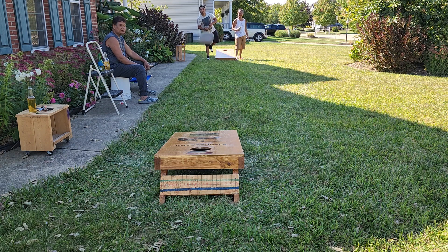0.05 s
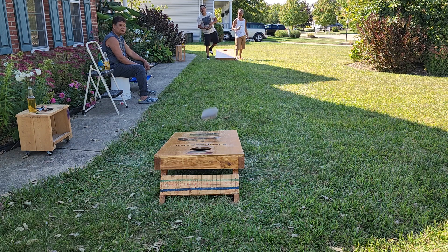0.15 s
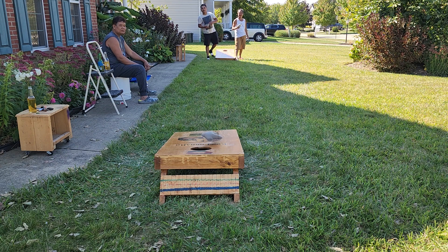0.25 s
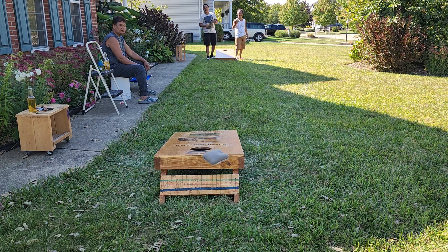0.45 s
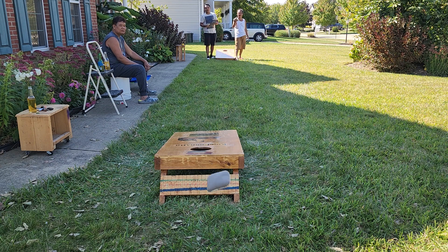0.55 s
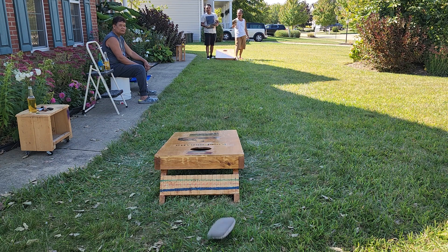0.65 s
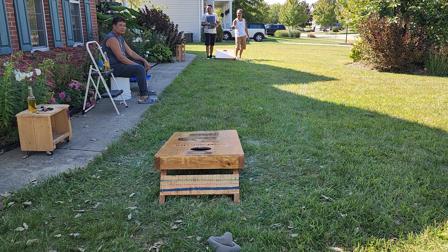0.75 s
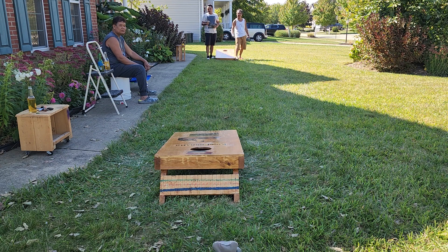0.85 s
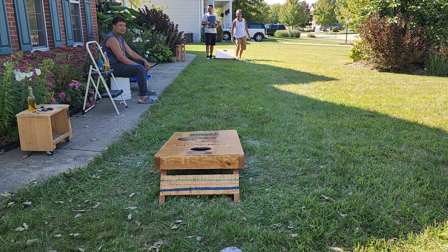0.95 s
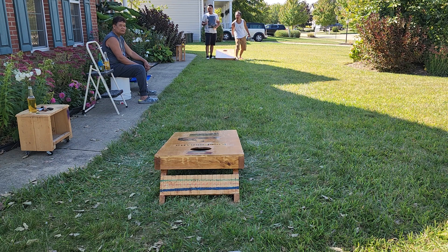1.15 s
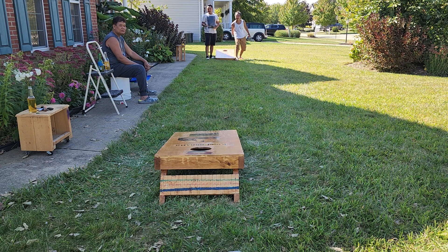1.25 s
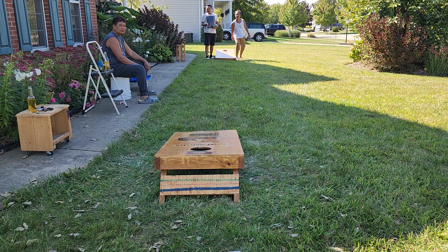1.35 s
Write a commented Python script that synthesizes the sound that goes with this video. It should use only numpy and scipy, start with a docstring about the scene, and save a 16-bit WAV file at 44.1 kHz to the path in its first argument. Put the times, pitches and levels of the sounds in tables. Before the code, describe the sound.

Loud woody beanbag thunk on a hollow board, faint grassy drop after, insects chirring quietly behind.

```python
"""Three insects chirp over a far chorus, a faint bird peeps, and distant traffic rumbles as shaped noise.
Then a beanbag slaps onto a hollow wooden board: filtered clicks ring the wood, and noise adds slap and tail.
The filling rattles as tiny random clicks, and so does the cloth that slides towards the edge.
At last the bag drops: the soil gives a dull ringing bump and the grass a soft swell of tiny clicks."""
import sys
import numpy as np
from scipy import signal
from scipy.fft import rfft, irfft, next_fast_len
from scipy.io import wavfile

SR = 44100
rng = np.random.default_rng(int(sys.argv[2]) if len(sys.argv) > 2 else 0)


def materialize(psi):
    """Save the field psi as 16-bit PCM at rate SR to the path in sys.argv[1].

    A 1-D psi becomes a single channel; in a 2-D psi each row is a channel.
    """
    bounded = np.clip(np.atleast_2d(psi).T, -1, 1)
    quanta = np.round(bounded * 32767).astype(np.int16)
    wavfile.write(sys.argv[1], SR, quanta)


N = 61739
T = np.arange(N) / SR  # time of every sample, in seconds
LAND_S = 0.2241  # the bag hits the board


def from_db(db):
    """Turn decibels into a gain."""
    return 10 ** (np.asarray(db) / 20)


def rms_one(x):
    """Scale a sound to an average strength (rms) of 1."""
    return x / np.sqrt(np.mean(x ** 2) + 1e-20)


def level(rows):
    """Draw a gain over time through points of time and dB."""
    return from_db(np.interp(T, *np.transpose(rows)))


def at_hz(points, hz):
    """Read a table between its points, on a log-frequency axis."""
    f, v = np.transpose(points)
    return np.interp(np.log(hz + 1), np.log(f), v)


def drift(rate):
    """Wander by chance with spread 1, no faster than about `rate` Hz."""
    noise = rng.standard_normal(N + SR)
    lowpass = signal.butter(2, rate, fs=SR, output="sos")
    return rms_one(signal.sosfilt(lowpass, noise)[SR:])  # skip the filter's first second


def colour(pair, spectrum):
    """Blend two unrelated sources into one stereo texture with the given spectrum and rms 1."""
    # how alike left and right are: (f/Hz, likeness from -1 to 1)
    ear_likeness = [(60, 0.95), (250, 0.97), (600, 0.56), (1200, -0.014), (2500, 0.37), (5000, 0.39),
                    (9000, -.15), (15000, -.2)]
    size = next_fast_len(N)
    hz = np.arange(size // 2 + 1) * SR / size
    mid, side = rfft(pair, size) * from_db(at_hz(spectrum, hz))
    alike = np.clip(at_hz(ear_likeness, hz), -.999, .999)
    shared = np.sqrt(1 + alike) * mid
    opposed = np.sqrt(1 - alike) * side * [[1], [-1]]
    return rms_one(irfft(shared + opposed, size)[:, :N])


def hiss(spectrum):
    """Make smooth stereo noise."""
    return colour(rng.standard_normal((2, N)), spectrum)


def grains(spectrum):
    """Scatter dense tiny clicks of uneven size, as many small contacts do."""
    grains_per_s, spread_db = 2400, 3.5
    loudness = spread_db * np.minimum(rng.exponential(1, (2, N)), 4)
    sizes = from_db(loudness) * rng.choice([-1, 1], (2, N))
    present = rng.random((2, N)) < grains_per_s / SR
    return colour(sizes * present, spectrum)


def burst(s, t60, rise):
    """Climb 60 dB in `rise` seconds to the top at s, then fall 60 dB in `t60` seconds."""
    return from_db(-60 * np.maximum((T - s) / t60, (s - T) / rise))


def ring(force, hz, t60):
    """Let a force set off a dying sine, about 1 high for a unit click."""
    r = from_db(-60 / (t60 * SR))  # what is left after each sample
    w = 2 * np.pi * hz / SR
    return signal.lfilter([0, np.sin(w)], [1, -2 * r * np.cos(w), r * r], force + 1e-18)


def push(s, db, low_hz, high_hz):
    """Make a contact: a click with less bass if it is light and less treble if it is soft."""
    click = np.full(N, 1e-18)
    click[int(s * SR)] = from_db(db)
    band = signal.butter(2, [low_hz, high_hz], "band", fs=SR, output="sos")
    return signal.sosfilt(band, click)


def board():
    """Each blow rings the board's modes; the landing adds a crack, a slap and a dense woody tail."""
    # the bag's face lands, its weight follows, then it slumps and flops over:
    # (t/s, level of the click before its filter/dB, lowest f/Hz, highest f/Hz)
    blows = [(0.2241, -1, 270, 4200), (0.2322, -4, 40, 380), (0.2657, -12, 20, 105), (0.3025, -18, 20, 380),
             (0.3295, -10, 20, 95)]
    # ways the hollow board vibrates: (f/Hz, relative level/dB, time to fall 60 dB/s)
    board_modes = [(85.9, -14.5, 0.54), (113.7, -19.5, 0.61), (163.4, -17, 0.58), (194.6, -23.5, .42),
                   (247.4, -23, 0.25), (263.6, -26, 0.69), (357.8, -3, .075), (399.2, -15, .1),
                   (520.3, -6.5, 0.073), (554.4, -20.5, .16), (657, -10.5, 0.11), (787.8, -13.5, 0.11),
                   (1048, -7, 0.023), (1290.6, -14, 0.058), (1486, -20, .06), (1736, -20.5, 0.041),
                   (2144, -17, .05), (2374, -16, 0.041), (2750, -20, .035), (3400, -31, .035)]
    # crack of the first hard contact: (f/Hz, relative level/dB, time to fall 60 dB/s)
    crack_modes = [(1950, -2.5, .003), (3700, -5, .003)]
    # tone of the slap: (f/Hz, relative level per Hz/dB)
    slap_spectrum = [(150, -13), (400, 1), (900, 0.5), (1500, 2), (2600, -0.5), (3700, -11), (5000, -29),
                     (8000, -28), (15000, -32.5)]
    # tone of the dying tail in the many small modes of the wood: (f/Hz, relative level per Hz/dB)
    tail_spectrum = [(100, -5), (300, -2), (650, -4), (1100, -18), (2500, -26), (5000, -32), (15000, -43)]
    scatter_db = 1.15  # every blow strikes each mode a little differently
    pan_db, lag_s = 0.08, .00003  # the left side is a touch louder, the right a touch later
    low_cut_hz = 55

    pushes = np.array([push(*blow) for blow in blows])
    scatter = rng.standard_normal((len(blows), len(board_modes)))
    strengths = from_db(scatter_db * scatter)
    knock = np.zeros(N)
    for k, (hz, db, t60) in enumerate(board_modes):
        sign = (-1) ** (k // 2)  # modes swing in pairs of opposite direction
        knock = knock + sign * from_db(db) * ring(strengths[:, k] @ pushes, hz, t60)
    for hz, db, t60 in crack_modes:
        knock = knock - from_db(db) * ring(pushes[0], hz, t60)
    knock = np.array([from_db(pan_db) * knock, np.interp(T - lag_s, T, knock)])

    slap = from_db(-12) * burst(LAND_S, t60=0.041, rise=0.00038) * hiss(slap_spectrum)
    tail = from_db(-20.5) * burst(LAND_S, t60=.17, rise=.001) * grains(tail_spectrum)
    highpass = signal.butter(2, low_cut_hz, "high", fs=SR, output="sos")
    return signal.sosfilt(highpass, knock + slap + tail)


def bag():
    """The filling rattles at every flop while the cloth slides over the wood towards the edge."""
    # shakes of the filling: (t/s, level/dB, time to fall 60 dB/s)
    rattles = [(0.223, -35, 0.18), (0.252, -58, 0.025), (0.273, -53, 0.025), (0.305, -52.5, 0.067),
               (0.335, -56.5, 0.081), (0.401, -56.5, 0.027)]
    # tone of the filling: (f/Hz, relative level/dB)
    filling_spectrum = [(800, -4), (2500, 2.5), (5000, -2.5), (8000, -6.5), (12000, -14.5), (16000, -12.5)]
    # loudness of the sliding cloth: (t/s, level/dB)
    slide_level = [(0.25, -32), (0.31, -51), (0.385, -54), (0.425, -59), (0.46, -52.5), (0.5, -62.5),
                   (0.56, -66), (0.68, -68), (0.9, -78)]
    # tone of the cloth: (f/Hz, relative level/dB)
    cloth_spectrum = [(300, 0.5), (900, 5), (2400, 0.5), (3600, -12.5), (6000, -20), (13000, -21),
                      (16000, -27)]
    shaken = sum(from_db(db) * burst(s, t60, rise=0.019) for s, db, t60 in rattles)
    sliding = (T > LAND_S) * level(slide_level)
    return shaken * grains(filling_spectrum) + sliding * grains(cloth_spectrum)


def thud():
    """The ground takes the bag's weight: a soft push rings the soil in a dull bump."""
    return ring(push(s=0.65, db=-37, low_hz=42, high_hz=202), hz=115, t60=0.071)


def grass():
    """Blades crush under the falling bag in one soft swell, then settle more slowly."""
    # tone of the grass: (f/Hz, relative level/dB)
    grass_spectrum = [(120, 9.5), (400, 0), (1000, 4.5), (2200, 0), (4000, -3.5), (8000, -6.5),
                      (12000, -5.5), (16000, -1)]
    top_s, rise_s = 0.7366, .11
    crush = from_db(-49) * burst(top_s, t60=0.13, rise=rise_s)
    settle = from_db(-62.5) * burst(top_s, t60=0.42, rise=rise_s)
    return (crush + settle) * grains(grass_spectrum)


def chirps(first, last, period, first_hz, last_hz, arch_hz, ear_phase):
    """Each wing stroke is a short, slightly rough tone whose pitch arches up and falls."""
    width_s, skew_s, jitter_s = .012, .002, .0008  # half width, loudness after pitch top, uneven timing
    waver_hz, rough_db = 30, 2.2
    centres = np.arange(first, last, period)
    centres = centres + jitter_s * rng.standard_normal(len(centres))
    nearest = np.abs(T[:, None] - centres).argmin(axis=1)
    since = T - centres[nearest]  # negative before the pitch top
    top_hz = np.interp(T, [first, last], [first_hz, last_hz])
    arch = arch_hz * np.minimum((since / width_s) ** 2, 2)
    hz = top_hz - arch + waver_hz * drift(300)
    stroke = np.exp(-((since - skew_s) / width_s) ** 4) * from_db(rough_db * drift(250))
    phase = 2 * np.pi * np.cumsum(hz) / SR
    return stroke * np.sqrt(2) * np.sin(phase + ear_phase * np.array([[.5], [-.5]]))


def singer(runs, arch_hz, db, pan_db, ear_phase):
    """Place one insect by a difference in level (dB) and in phase (radians) between left and right."""
    sides = from_db(db + pan_db * np.array([[.5], [-.5]]))
    return sides * sum(chirps(*run, arch_hz, ear_phase) for run in runs)


def insects():
    """Three insects beat out tones at their own pace over a far chorus of smooth noise."""
    # runs of chirps of the near insect, whose pitch arches strongly:
    # (first t/s, last t/s, period/s, first f at the top of the arch/Hz, last f at the top of the arch/Hz)
    near_runs = [(.037, .28, .057, 8150, 8080), (.494, 1.42, .0559, 7940, 8120)]
    # a farther, higher insect, nearly level in pitch: same columns
    high_runs = [(.036, .49, .063, 8330, 8310), (.54, 1.42, .0605, 8310, 8310)]
    # a farther, lower insect, nearly level in pitch: same columns
    low_runs = [(.513, 1.42, .0622, 7560, 7760)]
    # tone of the far chorus: (f/Hz, relative level/dB)
    chorus_spectrum = [(4000, -37), (5500, -19), (6500, -2.5), (7600, -2), (8400, 0.5), (9100, -7.5),
                       (10000, -31.5), (16000, -34)]
    # gain on all insects and the chorus: (t/s, level/dB)
    insect_level = [(0, 4), (.21, 4.5), (.3, -1.5), (.7, -1), (1.4, 0)]
    near = singer(near_runs, arch_hz=520, db=-58, pan_db=0.6, ear_phase=2.6)
    high = singer(high_runs, arch_hz=110, db=-61.0, pan_db=5.5, ear_phase=.8)
    low = singer(low_runs, arch_hz=110, db=-64.5, pan_db=4.5, ear_phase=0.36)
    chorus = from_db(-65.5) * hiss(chorus_spectrum)
    return level(insect_level) * (near + high + low + chorus)


def bird():
    """A far bird gives faint, thin peeps: sines that swell, fade and waver in pitch."""
    # peeps: (middle t/s, length/s, f/Hz, level/dB)
    peeps = [(.075, .05, 4930, -75), (.632, .016, 4980, -75), (0.674, 0.016, 4900, -74),
             (.865, .04, 4900, -76.5), (1.206, 0.014, 4780, -75)]
    song = np.zeros(N)
    for s, length, hz, db in peeps:
        swell = np.exp(-(2 * (T - s) / length) ** 2)
        phase = 2 * np.pi * np.cumsum(hz + 50 * drift(140)) / SR
        song = song + from_db(db) * swell * np.sin(phase)
    return song


def traffic():
    """Distant traffic is a low rumble and a slightly higher hum of smooth noise, both fading slowly."""
    # tone of the low rumble: (f/Hz, relative level/dB)
    rumble_spectrum = [(25, -11.5), (45, -2), (70, -1.5), (115, 2.5), (170, -2.5), (235, 2.5), (320, -12),
                       (450, -10.5), (800, -25.5), (1300, -30.5), (2500, -44.5), (5000, -46.5),
                       (15000, -63)]
    # loudness of the low rumble: (t/s, level/dB)
    rumble_level = [(0, -40.5), (.2, -44.5), (.65, -46.5), (.8, -47.5), (1.0, -47.5), (1.4, -49)]
    # tone of the higher part: (f/Hz, relative level per Hz/dB)
    traffic_spectrum = [(100, -12), (250, -4.5), (420, -3), (750, -5), (1200, -17), (2500, -32),
                        (6000, -52)]
    # loudness of the higher part: (t/s, level/dB)
    traffic_level = [(0, -57.5), (.6, -60), (1.4, -63.5)]
    rumble = level(rumble_level) * hiss(rumble_spectrum)
    return rumble + level(traffic_level) * hiss(traffic_spectrum)


def scene():
    """Add the bag on the board, its drop into the grass, the animals and the traffic."""
    throw = board() + bag() + thud() + grass()
    return throw + insects() + bird() + traffic()


def record(dry):
    """Round the loudest peaks below a ceiling of 1 and cut the highest treble."""
    rounded = dry / (1 + dry ** 4) ** (1 / 4)
    lowpass = signal.cheby2(16, 70, 16500, fs=SR, output="sos")  # 70 dB down from 16500 Hz up
    return signal.sosfilt(lowpass, rounded)


dry = scene()
out = record(dry)
materialize(out)
```